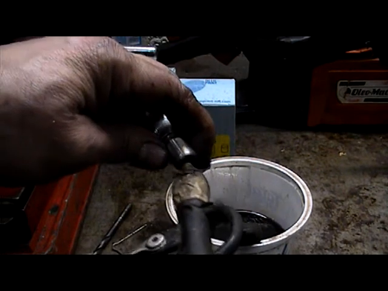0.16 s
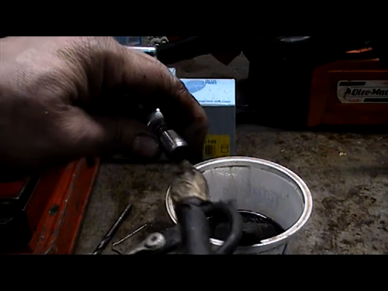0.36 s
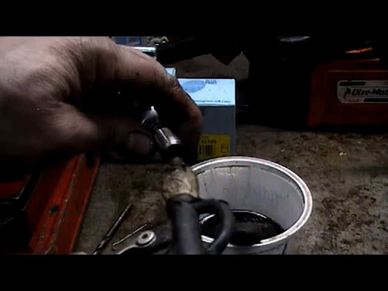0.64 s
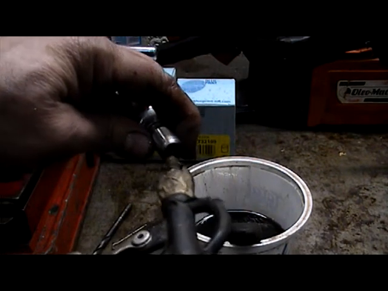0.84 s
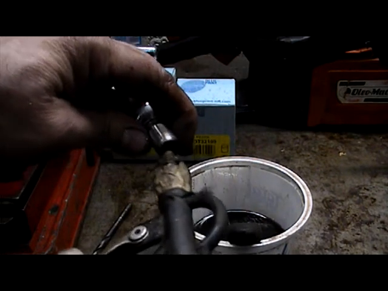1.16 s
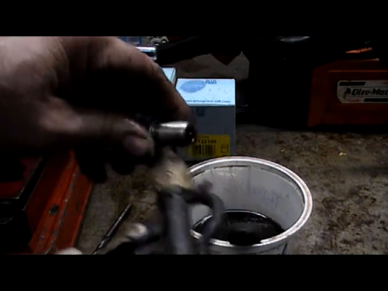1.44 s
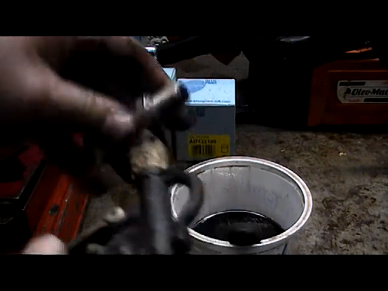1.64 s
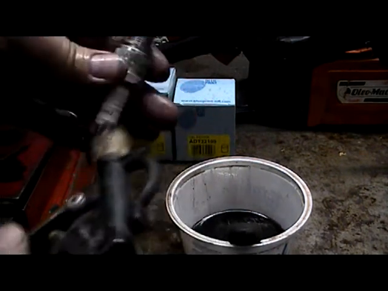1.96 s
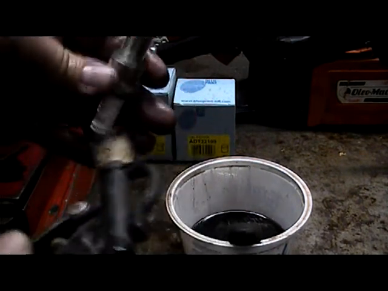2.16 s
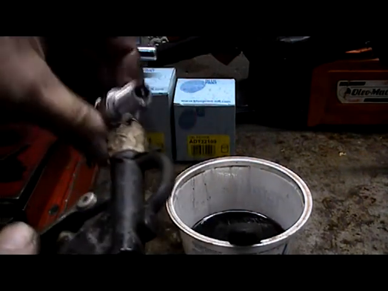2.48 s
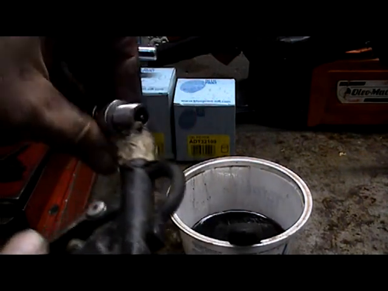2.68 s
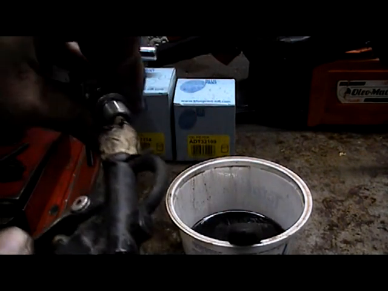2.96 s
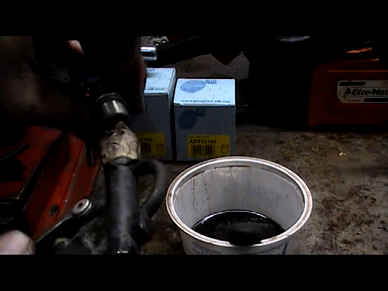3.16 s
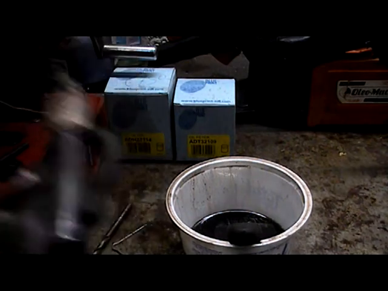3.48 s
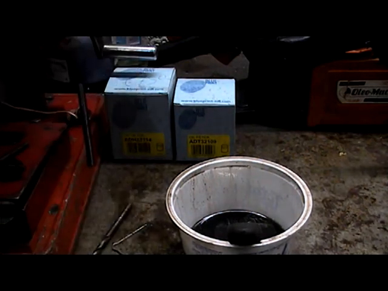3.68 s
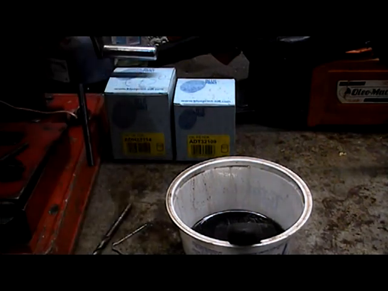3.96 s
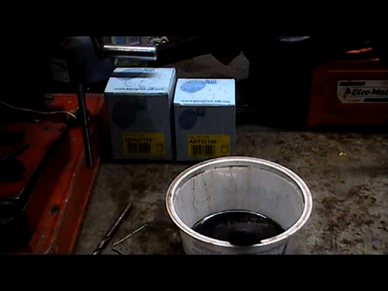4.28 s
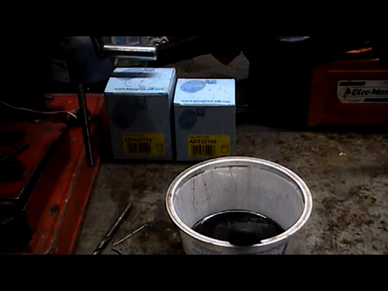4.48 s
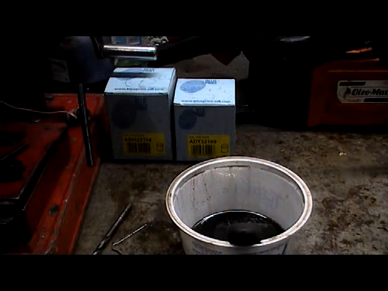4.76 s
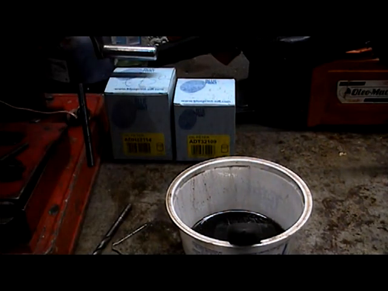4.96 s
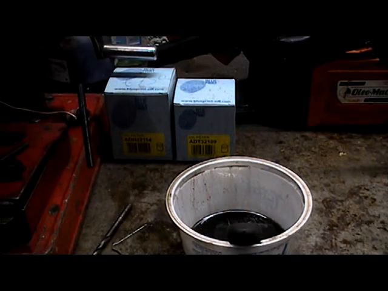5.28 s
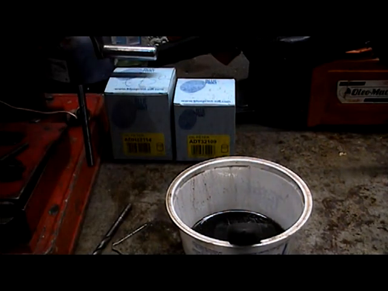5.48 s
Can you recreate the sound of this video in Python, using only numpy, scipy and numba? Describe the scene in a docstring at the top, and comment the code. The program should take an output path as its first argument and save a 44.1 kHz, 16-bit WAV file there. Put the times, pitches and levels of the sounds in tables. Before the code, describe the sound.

Quiet workshop air and a thin, high leak hiss open the scene. At about 0.17 s a small lever click leads straight into a loud compressed-air blast, close to a stereo microphone. Bright, dense hiss dominates, with a wavering hollow rush around the part's bore and rough lower roar. From 0.2 to 1.3 s, bursts of low wind buffeting hit the microphone; a short whistle sings near 0.3 s, with fainter chirps around 1.0, 1.3 and 2.7-3.1 s. The hiss changes colour and flutters as the part turns. At 3.26 s it shuts off almost instantly, leaving a diffuse echo about a second long, while the leak hiss becomes audible again and fades by 4.3 s. Faint ticks and knocks come around 4.2-4.5 s with a steel chink, a hard clack and thud at 4.76 s, another thud at 5.1 s, then small rattles and slides until 5.35 s, over low room air.

```python
"""A lever clicks and a blow gun opens on a small hollow metal part in a workshop: banded noise for hiss, splash,
bore rush and roar, short sung whistles, and gusts and low thumps on two microphone ports.
The valve shuts; gain control creeps back over the echo (decaying noise bands) and a small leak.
Then tools are laid on a bench: modes and grit struck as thud, clack and crack, with slides and steel chinks.
Steady workshop air lies under it all."""
import sys
import numpy as np
from scipy import signal
from scipy.fft import rfft, irfft
from scipy.io import wavfile
from scipy.ndimage import uniform_filter1d
from numba import njit

SR = 44100
rng = np.random.default_rng(int(sys.argv[2]) if len(sys.argv) > 2 else 0)


def waveform_to_disk(signal):
    """Save audio, clipped to [-1, 1], as 16-bit WAV at the path in sys.argv[1]."""
    frames = np.transpose(np.atleast_2d(signal))
    scaled = np.clip(frames, -1, 1) * 32767
    samples = np.round(scaled).astype(np.int16)
    wavfile.write(sys.argv[1], SR, samples)


N = 247916
T = np.arange(N) / SR
F = np.maximum(np.fft.rfftfreq(N, 1 / SR), 1.)

JET_OVER_DB = 25  # boost on all jet levels, and the range of the gain control
# likeness of jet and leak noise at the two ports: freq_hz, likeness (0 to 1)
JET_LIKE = [(60, .5), (700, .5), (1400, .45), (2800, .93), (5500, .84), (8500, .88), (10500, .75),
            (13000, .55)]
# likeness of room sound at the two ports: freq_hz, likeness (0 to 1)
SHOP_LIKE = [(100, 0.9), (500, 0.98), (1400, 0.82), (3000, 0.63), (5500, 1), (8000, 0.24), (12000, 1)]
# phase by which left leads for room sound: freq_hz, lead_rad
SHOP_LEAD = [(100, 0.087), (1400, 0.29), (3000, 0.23), (5500, 1.53), (8000, 0.68), (10200, 2.4),
             (12000, 2.76)]
# balance of room sound: freq_hz, left_minus_right_db
SHOP_PAN = [(100, 0), (1400, 1.1), (3300, 3), (5500, -1.5), (8000, 2), (10200, -4), (12000, -2)]


def undb(db):
    """Amplitude ratio of a level in dB."""
    return 10 ** (np.asarray(db) / 20)


def unit(x):
    """Scale to an rms of 1."""
    return x / np.sqrt(np.mean(x ** 2))


def over_hz(table, column=1):
    """A table column spread over all frequencies, straight on a log axis."""
    table = np.array(table)
    return np.interp(np.log(F), np.log(np.maximum(table[:, 0], 1.)), table[:, column])


def walk(rate_hz):
    """Random levels held 1 / rate_hz s and smoothed twice; spread near 1."""
    hold = int(SR / rate_hz)
    steps = np.repeat(rng.standard_normal(N // hold + 1), hold)
    return 0.82 * uniform_filter1d(uniform_filter1d(steps, hold), hold)[:N]


def bands(lo_hz, hi_hz, step_oct=0.4881):
    """Overlapping windows of equal power, step_oct apart, with their centres in octaves."""
    for octave in np.arange(np.log2(lo_hz) + step_oct / 2, np.log2(hi_hz), step_oct):
        yield octave, np.cos(np.pi / 2 * np.clip((np.log2(F) - octave) / step_oct, -1, 1))


def ports(like, lead):
    """Spectra of white noise at two microphone ports: partly alike, the right one lagging in phase."""
    left, other = rfft(rng.standard_normal((2, N)))
    c = np.clip(over_hz(like), 0, 1)
    right = (c * left + np.sqrt(1 - c ** 2) * other) * np.exp(-1j * over_hz(lead))
    return np.array([left, right])


def air(noise, lo_hz, hi_hz, shared_db, own_db, rate_hz, tilt_db=0, narrow_db=0, pivot_hz=9000, step_oct=1 / 3):
    """Turbulent noise: bands flutter together and each flickers alone; tilt and narrowing turn about the pivot."""
    shared = shared_db * walk(rate_hz)
    total = 0
    for octave, window in bands(lo_hz, hi_hz, step_oct):
        above_oct = octave - np.log2(pivot_hz)
        colour_db = (tilt_db - narrow_db * above_oct) * above_oct
        flicker_db = shared + own_db * walk(rate_hz / 2)
        total = total + irfft(noise * window, N) * undb(flicker_db + colour_db)
    return unit(total)


def jet():
    """Nozzle hiss, splash, bore rush and roar on the part, with gusts on the ports, all gated by the valve."""
    # band limits from hiss down to gusts: edge_hz
    edges_hz = (7500, 4725, 2362, 1181, 186)
    # spectrum of the blast: freq_hz, density_db_per_hz
    colour = [(20, -37), (40, -24.5), (243, -15.5), (1400, -14), (2600, -9), (3300, -8), (3950, -6.5),
              (4400, -13), (6200, -15), (8700, -1), (9500, 0), (10500, -3), (11600, -7.5), (14300, -19.5),
              (15500, -37)]
    # balance of the blast: freq_hz, left_minus_right_db
    balance = [(1400, 1), (2800, -.3), (5500, 0), (7200, 1.5), (8700, 0.5), (10200, -3), (11500, 0),
               (13000, 4)]
    # phase by which left leads: freq_hz, lead_rad
    lead = [(100, 0), (1400, .8), (2800, .05), (6000, .3), (9800, .3), (10500, .9), (11500, 2.5),
            (12200, 2.5), (14000, .6)]
    # the gun turns: time_s, hiss left_minus_right_db, hiss tilt_db_per_oct, hiss narrowing_db_per_oct2,
    # bore rush tilt_db_per_oct
    aim = [(0.191, 0, 11.5, 5, 5), (0.65, 0.5, 11, 13, 4.5), (1.0, 0.5, 1.5, -4, 5),
           (1.3, 0.3, 6.5, -1, 0.5), (1.55, 0, 8, -3, -13), (1.77, -1.0, -0.5, -15, -0.5),
           (2.2, -1, -2, -19, -0.5), (2.57, -0.5, 3.5, -6, -12), (2.8, -1.2, 12, 22, -1.5),
           (3.05, -2, 18, 30, -5), (3.25, -1.5, 6.5, 20, -6.5)]
    hiss, splash, bore, roar, gust, thump = levels()
    s, *columns = np.transpose(aim)
    pan_db, tilt_db, narrow_db, bore_tilt_db = (np.interp(T, s, column) for column in columns)
    sides = np.array([[.5], [-.5]])
    noise = ports(JET_LIKE, lead) * undb(over_hz(colour) + over_hz(balance) * sides)
    top, upper, middle, lower, bottom = edges_hz

    hiss_air = air(noise, top, 18000, 1.26, 1.0, 60.07, tilt_db, narrow_db, step_oct=1 / 6)
    sound = undb([pan_db / 2, -pan_db / 2]) * hiss * hiss_air
    sound += splash * air(noise, upper, top, 2.9, 0.86, 49.65)
    sound += bore * air(noise, middle, upper, 0.84, 3.26, 49.82, bore_tilt_db, pivot_hz=3460)
    sound += bore * bore_ring()
    sound += roar * air(noise, lower, middle, 2.1, 3.9, 49.65)

    gusts = gust * air(noise, bottom, lower, 3.3, 0.73, 70)
    gusts += thump * air(noise, bottom / 8, bottom, 1.0, 1.2, 29.9, step_oct=0.508)
    gusts += puffs()
    gate = valve()
    return gate * slips() * sound, gate * slips() * gusts * undb([[1.0], [-1.0]])


def levels():
    """Gain of each part of the blast: the slow hold, plus a share of every pass."""
    # how the part is held in the jet: time_s, hiss_db, splash_db, bore_rush_db
    hold = [(0.19, -25.5, -34.5, -34), (0.59, -25.5, -31, -31.5), (0.77, -24.5, -35, -35),
            (1.16, -24.0, -37.5, -36), (1.26, -24, -37.5, -34), (1.51, -23.0, -34.0, -39),
            (1.76, -25.5, -32, -35.5), (1.99, -25.5, -32, -30), (2.33, -24.5, -34, -38.0),
            (2.53, -25.5, -33, -40.5), (2.69, -26, -36.5, -40), (2.71, -24.5, -38.5, -41),
            (3.01, -25.5, -38, -34), (3.11, -25.0, -39.5, -39.5), (3.25, -25.5, -39.5, -43.5)]
    # jet sweeps the part, air spills to the ports: start_s, end_s, full thump_swell_db, full extra_roar_db
    passes = [(0.21, 0.28, 24.5, 0), (0.3, 0.31, 9, -2), (0.35, 0.45, 28.5, 0.5), (0.492, 0.61, 21.5, -0.5),
              (0.608, 0.742, 19.5, -1.5), (0.768, 0.85, 27.5, 1), (0.905, 1.05, 22.5, 0.5),
              (1.101, 1.15, 16.5, 0.5), (1.174, 1.235, 20, 3.0), (1.28, 1.29, 9, -8.5),
              (1.37, 1.69, 6, -2.5), (1.645, 1.67, 7.5, 1.5), (1.767, 1.914, 14, -1),
              (1.948, 2.01, 12, -1.5), (2.04, 2.2, 12, -2), (2.188, 2.27, 18.5, 0),
              (2.352, 2.443, 7.5, -0.5), (2.478, 2.59, -1.0, 3.5), (2.59, 2.67, 5, 9),
              (2.706, 2.72, 21, -3), (2.75, 2.87, 15.5, 3), (2.875, 2.973, 20, -0.5), (3.072, 3.1, 25, -1),
              (3.11, 3.19, 14, -2.5), (3.206, 3.25, 19.5, 8.5)]
    # spill per dB of thump on hiss, splash, bore, roar, gusts: share_db_per_db
    spill_share = (0.24, 0.22, 0.2, 0.19, 0.46)
    # splash and bore rise per dB of extra roar: share_db_per_db
    roar_share = (0.35, 0.79)
    sweep_s = 0.037  # ramp in and out of a pass
    thump_db, gust_db, roar_db = -71.5, -49.5, -44  # between passes
    roar_follows = 0.58  # dB of roar per dB of splash over its mean

    s, *columns = np.transpose(hold)
    hiss, splash, bore = (np.interp(T, s, db) for db in columns)
    start, end, *swells = np.transpose(passes)[:, :, None]
    on = np.clip(np.minimum(T - start, end - T) / sweep_s + .5, 0, 1)
    spill, hollow = (np.sum(on * db, axis=0) for db in swells)
    roar = roar_db + roar_follows * (splash - np.mean(columns[1])) + hollow
    splash = splash + roar_share[0] * hollow
    bore = bore + roar_share[1] * hollow
    held = [hiss, splash, bore, roar, gust_db + 0 * T]
    gains = [undb(db + share * spill) for db, share in zip(held, spill_share)]
    return gains + [undb(thump_db + spill)]


def valve():
    """Gain of the valve: cracks, creeps, gives way; later shuts in a few ms and the nozzle sighs out."""
    crack_s, creep_db_per_s = .166, 1500
    give_s, give_db, give_tau_s = .1765, -30, .0035
    shut_s, shut_db_per_s, sigh_tau_s = 3.257, 4000, .03
    creep_db = give_db - creep_db_per_s * (give_s - T)
    give_way_db = give_db * np.exp(-np.maximum(0, T - give_s) / give_tau_s)
    opening = (T > crack_s) * undb(np.where(T < give_s, creep_db, give_way_db))
    sigh = .04 * np.exp(-np.maximum(0, T - shut_s) / sigh_tau_s)
    return opening * (sigh + .96 * undb(np.minimum(0, (shut_s - T) * shut_db_per_s)))


def slips():
    """Gain jumps as the jet slips off or catches an edge, each fading back exponentially."""
    # time_s, jump_db, fade_tau_s
    jumps = [(0.451, -3.5, 0.064), (0.842, -3, 0.028), (1.318, -12, 0.012), (2.268, -3, 0.029),
             (2.706, -7.5, 0.012), (2.953, -7, 0.011), (2.696, 7, 0.0061)]
    total_db = 0
    for at, db, tau_s in jumps:
        total_db = total_db + db * np.exp(-np.maximum(0, T - at) / tau_s) * (T > at)
    return undb(total_db)


def puffs():
    """Stray air slaps the ports: short odd pressure pulses under a bell."""
    # time_s, level_db
    slaps = [(0.256, -31), (0.303, -38), (0.316, -31), (0.403, -25.5), (0.559, -38), (0.659, -35),
             (2.703, -36), (3.145, -30)]
    out = np.zeros(N)
    for at, db in slaps:
        u = (T - at) / 0.0014
        out += undb(db) * np.sin(1.6 * u) * np.exp(-u ** 2 / 2)
    return out


def bore_ring():
    """Narrow turbulent noise that follows the wavering pitch of the bore's air column."""
    # time_s, centre_hz, level_over_bore_rush_db
    column_ring = [(0.201, 3700, -10), (.3, 3880, 0), (.4, 3500, -7), (0.549, 3697, -5), (.68, 3650, -8),
                   (.83, 3853, -6), (.98, 3735, -4), (1.05, 3900, -17), (1.22, 3650, -5), (1.5, 3500, -15),
                   (1.97, 3640, -11.5), (2.4, 3620, -15), (2.61, 3796, -4), (2.75, 3500, -6),
                   (2.9, 3750, -7), (3.0, 3990, -1), (3.1, 3810, -6), (3.25, 3710, -5)]
    width_hz = 650
    s, hz, db = np.transpose(column_ring)
    lowpass = signal.butter(2, width_hz / 2, fs=SR, output="sos")
    slow = signal.sosfilt(lowpass, rng.standard_normal((2, N)))
    phase = 2 * np.pi * np.cumsum(np.interp(T, s, hz) * (1 + .04 * walk(25))) / SR
    narrow = unit(slow[0] * np.cos(phase) + slow[1] * np.sin(phase))
    return narrow * undb(np.interp(T, s, db) + 3.3 * walk(40.16))


def whistles():
    """The jet crosses the bore, which sings for a moment, unsteady in pitch and strength."""
    # start_s, length_s, start_hz, end_hz, level_db
    notes = [(.29, .04, 4000, 3800, -20.5), (.325, .035, 3850, 3900, -30), (.96, .03, 3850, 3800, -31),
             (1.297, .024, 4050, 3650, -27), (2.693, .009, 4050, 4050, -24), (2.72, .02, 4150, 4150, -35),
             (2.785, .012, 3700, 3700, -31), (2.89, .05, 3750, 3750, -35), (2.94, .055, 3850, 4100, -33),
             (3.012, .022, 3950, 3800, -31), (3.072, .02, 2900, 2600, -28), (3.076, .014, 3250, 2950, -30)]
    out, waver, breath = np.zeros(N), walk(300), undb(3.5 * walk(300))
    for s, length, start_hz, end_hz, db in notes:
        u = np.clip((T - s) / length, 0, 1)
        hz = (start_hz + (end_hz - start_hz) * u) * (1 + .018 * waver)
        swell = np.sqrt(2 * np.sin(np.pi * u))
        out += undb(db) * swell * np.sin(2 * np.pi * np.cumsum(hz) / SR)
    return out * breath


def ring(modes, t, ragged_s, tilt_db=0, ragged=0.52):
    """A sharp push, then contact noise, on a set of modes; a harder blow favours the upper ones; peak 1."""
    chance = rng.standard_normal((len(modes), 2))
    y = 0
    for (hz, db, t60_s), (a, b) in zip(modes, chance):
        mode_gain = undb(db + tilt_db * np.log2(hz / modes[0][0]) + 2 * a)
        y = y + mode_gain * np.sin(2 * np.pi * hz * (1 + 0.037 * b) * t) * undb(-60 * t / t60_s)
    contact = rng.standard_normal(len(t)) * np.exp(-t / ragged_s) / np.sqrt(ragged_s * SR / 2)
    push = ragged * contact + (t == 0)
    y = signal.fftconvolve(y, push)[:len(t)]
    return y / np.abs(y).max()


def grit(t, lo_hz, hi_hz):
    """Band of contact noise at rms 1."""
    bandpass = signal.butter(2, [lo_hz, hi_hz], "bandpass", fs=SR, output="sos")
    return unit(signal.sosfilt(bandpass, rng.standard_normal(len(t))))


def knock(t, thud_db, clack_db, crack_db, thud_tilt_db, clack_tilt_db):
    """A tool meets the bench: thud of the top, clack of the tool, crack and rattle of loose parts."""
    # bench top modes: freq_hz, level_db, t60_s
    top_modes = [(180, -12, .06), (245, 0, .12), (285, -3, .1), (335, -5, .1), (400, -8, .07),
                 (500, -7, .09), (570, -8, .09), (655, -8, .09)]
    # tool body modes: freq_hz, level_db, t60_s
    tool_modes = [(883, 0, .05), (1000, -2, .03), (1300, -2, .03), (1500, -3, .025), (1750, -4, .02),
                  (1950, -5, .02), (2400, -7, .015)]
    crack = grit(t, 2200, 4000) * .4 * undb(-60 * t / .05)
    crack += grit(t, 3500, 9000) * .2 * undb(-60 * t / .015)
    crack += grit(t, 1800, 4200) * .035 * undb(-60 * t / .8)
    crack += grit(t, 4500, 9000) * .03 * undb(-60 * t / .6)
    clack = ring(tool_modes, t, 0.0024, clack_tilt_db)
    clack += grit(t, 1050, 2300) * 0.18 * undb(-60 * t / 0.059)
    clack += grit(t, 710, 1930) * 0.036 * undb(-60 * t / 1.2)
    thud = ring(top_modes, t, 0.0034, thud_tilt_db)
    thud += grit(t, 180, 700) * 0.12 * undb(-60 * t / 0.45)
    onset = 1 - np.exp(-t * 3000)
    return onset * (undb(thud_db) * thud + undb(clack_db) * clack + undb(crack_db) * crack)


def chink(t, db, tick_db):
    """A small steel part rings high from ragged contact, with a tick of grit."""
    # freq_hz, level_db, t60_s
    steel_modes = [(11850, 0, .03), (12250, -3, .02), (11400, -6, .015), (10700, -12, .012)]
    tick = grit(t, 3200, 9300) * undb(tick_db - 60 * t / 0.036)
    return undb(db) * ring(steel_modes, t, 0.0028, ragged=3.4) + tick


def bench():
    """Lever click, then tools laid down, steel chinks and slides, set in stereo as room sound."""
    # tools laid down: time_s, thud_db, clack_db, crack_db, thud hardness_db_per_oct, clack hardness_db_per_oct
    knocks = [(4.19, -70, -70, -48, 4, 2), (4.457, -48, -47, -53, 1, 0), (4.464, -43, -56, -54, 6, -3),
              (4.472, -41.5, -62, -58, -9, 0), (4.4957, -52, -39, -49, -2, -17),
              (4.508, -42, -60, -58, -2, 0), (4.76, -22.5, -18.5, -24, 9, 1),
              (4.767, -26, -30, -39.5, 8, -9), (4.78, -26, -30, -36, 4, -8), (4.797, -32, -42, -48, 5, -13),
              (4.867, -38, -53, -57, 1, 0), (5.105, -23.5, -31, -31, -3.5, 5), (5.124, -38, -44, -54, 1, 0),
              (5.17, -35, -34, -42, -8, 0), (5.206, -34.5, -45, -58, 0, -3), (5.225, -37, -28, -37, 2, 4),
              (5.248, -38, -44, -61, 0, 3), (5.27, -43, -39, -52, 5, 2), (5.338, -47, -60, -62, -9, 0)]
    # small steel part: time_s, ring_peak_db, tick_db
    chinks = [(4.544, -29, -48), (4.787, -27, -62)]
    # tools slide: start_s, length_s, level_db
    scrapes = [(4.739, 0.019, -49.5), (4.95, .05, -62), (5.03, 0.06, -56), (5.185, .03, -58),
               (5.232, 0.025, -51), (5.29, .16, -61)]
    # lever click: time_s, level_db
    trigger = (.1648, -33)
    out, t = np.zeros(N + SR), np.arange(SR // 2) / SR
    for s, *blow in knocks:
        out[int(s * SR):][:len(t)] += knock(t, *blow)
    for s, db, tick_db in chinks:
        out[int(s * SR):][:len(t)] += chink(t, db, tick_db)
    for s, length, db in scrapes:
        swell = np.sin(np.pi * np.clip(t / length, 0, 1))
        out[int(s * SR):][:len(t)] += undb(db) * grit(t, 1200, 1620) * swell
    click = np.sin(2 * np.pi * 2000 * t) * np.exp(-t / .0005)
    out[int(trigger[0] * SR):][:len(t)] += undb(trigger[1]) * click
    mono = rfft(out[:N]) / np.sqrt(1 + (150 / F) ** 7)  # rolled off below 150 Hz, which keeps the knocks lean
    pan = undb(2.7 * over_hz(SHOP_PAN) / 2)  # 2.7 times the room's balance
    return irfft(np.array([mono * pan, mono / pan * np.exp(-1j * over_hz(SHOP_LEAD))]), N)


def echo(x):
    """Diffuse workshop tail; each noise band dies at its own rate."""
    # freq_hz, t60_s, level_db
    decay = [(200, 1.3, -13), (690, 0.57, -11), (1500, 1.1, -22), (2200, 1.3, -19), (3300, 1.15, -24),
             (3900, 1.15, -20), (4600, 1.0, -18), (6000, 0.8, -16.5), (7500, 0.7, -20), (8600, .55, -25.5),
             (9500, 0.45, -31), (10700, .45, -23), (11800, 0.47, -14), (13000, 0.45, -8)]
    pan_db = -1  # left minus right
    noise, tail = ports(SHOP_LIKE, SHOP_LEAD), 0
    t60_s, level = over_hz(decay), undb(over_hz(decay, column=2))
    for _, window in bands(100, 16000, step_oct=.3):
        centre = np.argmax(window)
        fade = undb(-60 * T / t60_s[centre]) * (1 - np.exp(-T / 0.0026))
        tail = tail + irfft(noise * window * level, N) * fade / np.sqrt(np.sum(fade ** 2))
    wet = signal.fftconvolve(x[None], tail[:, :2 * SR], axes=1)[:, :N]
    return wet * undb([[pan_db / 2], [-pan_db / 2]])


def leak():
    """Steady coloured hiss of a small leak at the gun, fading as the gun is carried off."""
    # time_s, level_db
    course = [(0, -47.5), (3.4, -45), (3.6, -47.5), (3.75, -46), (3.9, -50), (4.1, -56.5), (4.3, -64),
              (5.62, -65)]
    # freq_hz, density_db_per_hz
    colour = [(1500, -41), (3400, -26), (5500, -9.5), (7500, -5.5), (9500, 4), (12500, 1.5), (13600, -5),
              (14600, -21)]
    hiss = unit(irfft(ports(JET_LIKE, SHOP_LEAD) * undb(over_hz(colour)), N))
    return undb(np.interp(T, *np.transpose(course))) * hiss


def shop():
    """Workshop air: broad noise whose bands drift slowly and slightly."""
    # freq_hz, density_db_per_hz
    colour = [(25, -23), (60, -7.5), (120, -9.5), (250, -4.5), (900, -3), (1300, -8), (2000, -15.5),
              (3300, -9.5), (5000, -23.5), (7500, -21.5), (10000, -13), (12800, -11), (13600, -74)]
    level_db = -57.5
    noise, pan = ports(SHOP_LIKE, SHOP_LEAD), undb(over_hz(SHOP_PAN) / 2)
    coloured = noise * undb(over_hz(colour)) * np.array([pan, 1 / pan])
    return undb(level_db) * air(coloured, 18.5, 16000, 0.91, 0.44, 5.23, step_oct=0.7)


def scene():
    """Sum of the jet, tools, their echo, the leak and the workshop air."""
    blast, gusts = (undb(JET_OVER_DB) * x for x in jet())
    whistle = undb(JET_OVER_DB) * whistles()
    sources = blast + bench()
    # only the upper part of the low rush is sound in the room; the rest is wind on the ports
    rush = irfft(rfft(gusts) * np.minimum(1, (F / 1300) ** 2.8), N)
    whistle_echo_db = -10  # whistles are sent only faintly to the echo
    echo_send = (sources + rush).mean(axis=0) + undb(whistle_echo_db) * whistle
    return sources + gusts + whistle + echo(echo_send) + leak() + shop()


@njit
def cut(over_db, attack, release_db):
    """Gain cut in dB that follows a rise fast and comes back by at most release_db per sample."""
    out, c = np.empty(len(over_db)), 0.
    for i in range(len(over_db)):
        if over_db[i] > c:
            c = c + attack * (over_db[i] - c)
        else:
            c = max(over_db[i], c - release_db)
        out[i] = c
    return out


def record(dry):
    """Gain control with a limited range, rounded peaks, then the top cut."""
    threshold_db, release_db_per_s, top_hz = -29, 58, 15300
    power = signal.lfilter([.004], [1, -.996], np.mean(dry ** 2, axis=0))
    # 2 dB of cut asked per dB over the threshold
    over_db = np.clip(2 * (10 * np.log10(power + 1e-12) - threshold_db), 0, JET_OVER_DB)
    wet = dry * undb(-cut(over_db, 0.0032, release_db_per_s / SR))
    wet = np.tanh(2.2 * wet) / 2.2
    return signal.sosfilt(signal.ellip(10, .2, 80, top_hz, fs=SR, output="sos"), wet)


dry = scene()
out = record(dry)
waveform_to_disk(out)
```